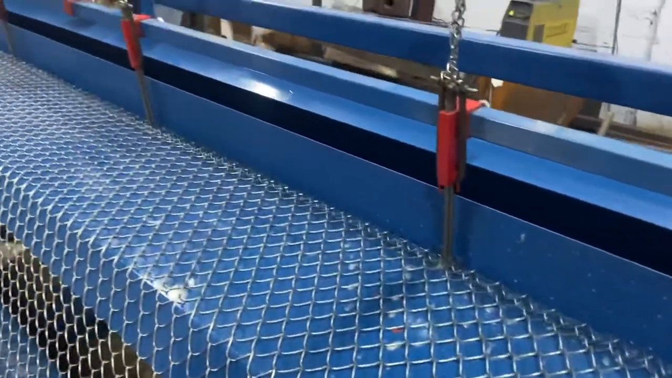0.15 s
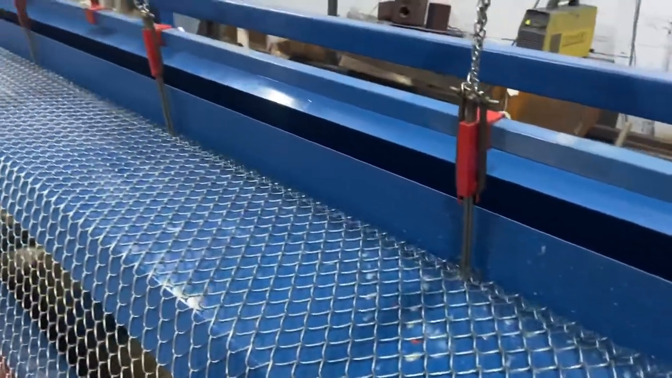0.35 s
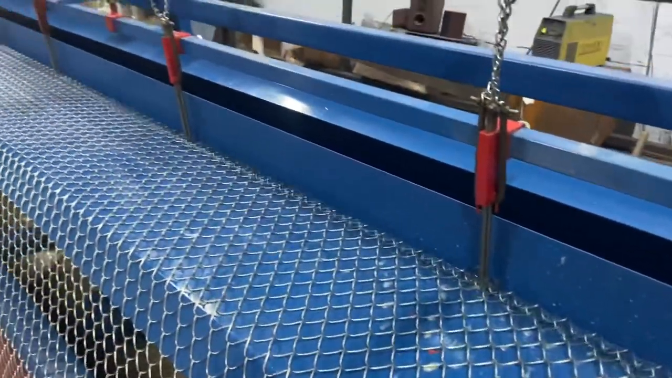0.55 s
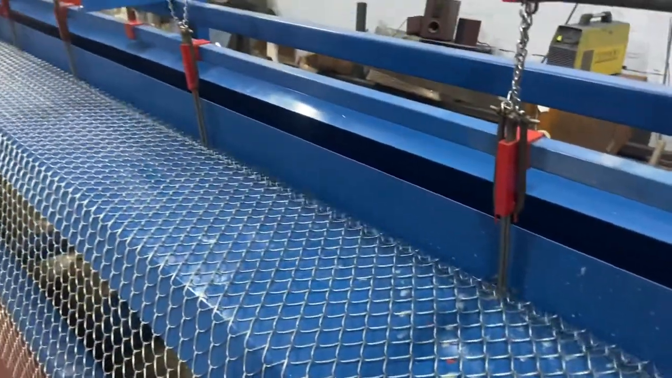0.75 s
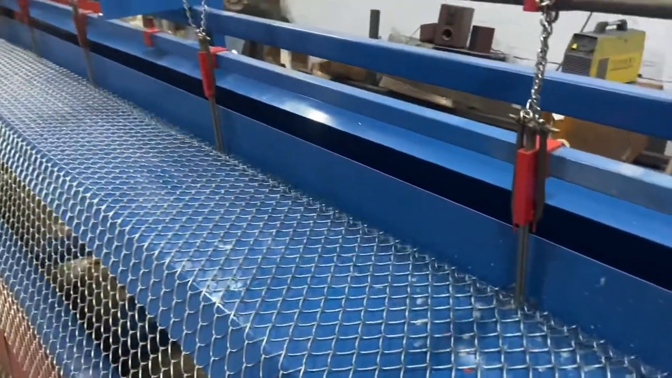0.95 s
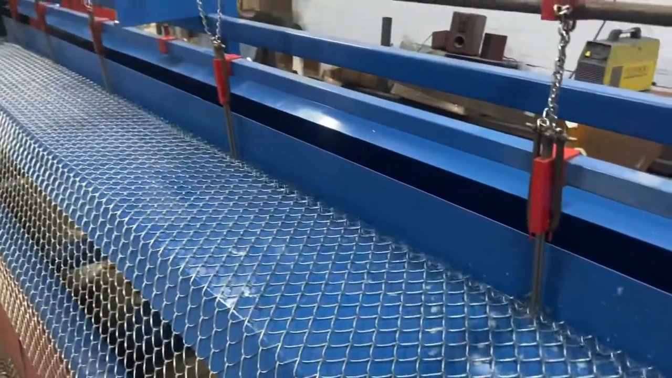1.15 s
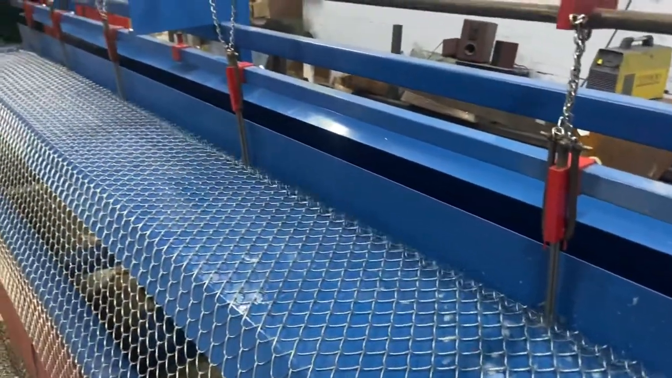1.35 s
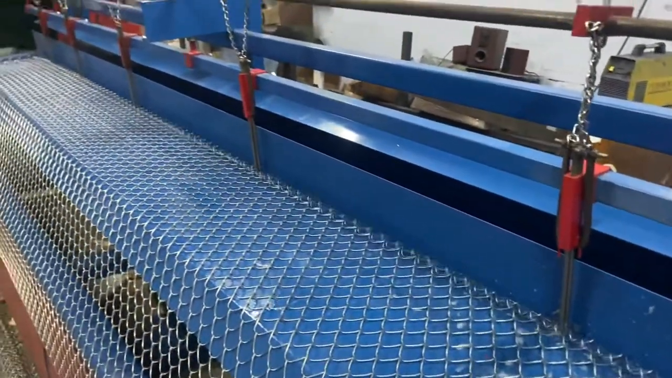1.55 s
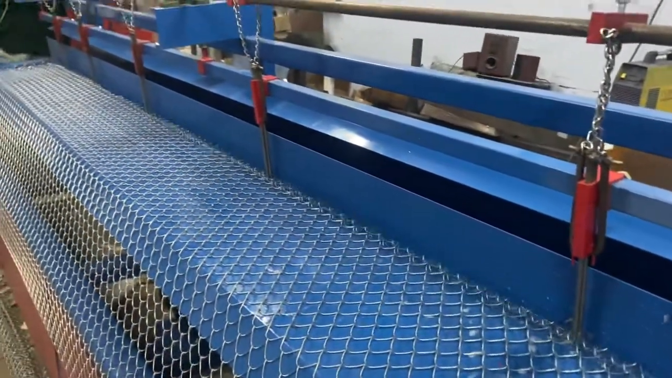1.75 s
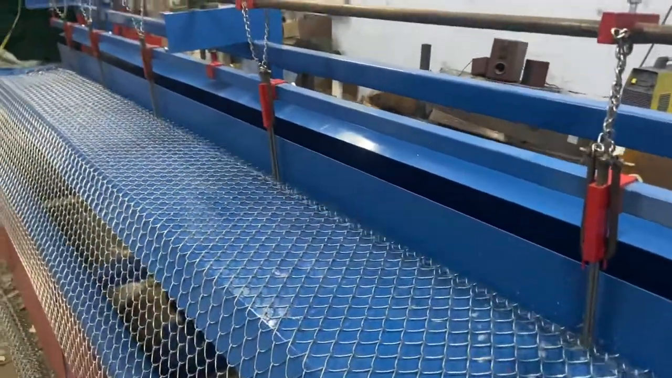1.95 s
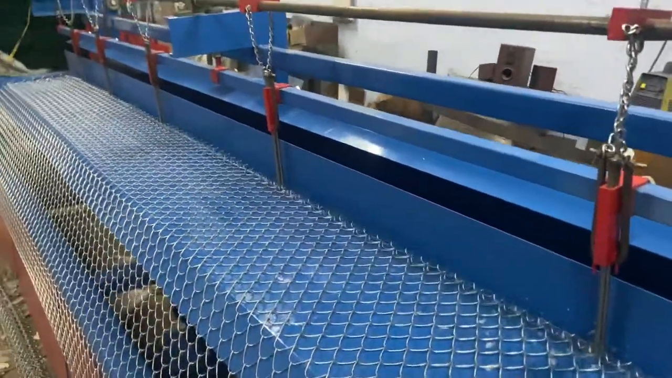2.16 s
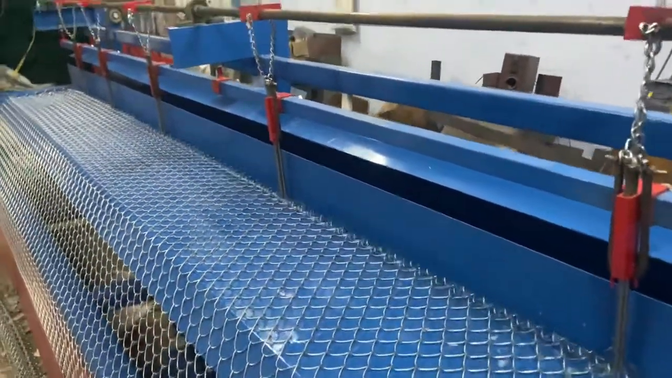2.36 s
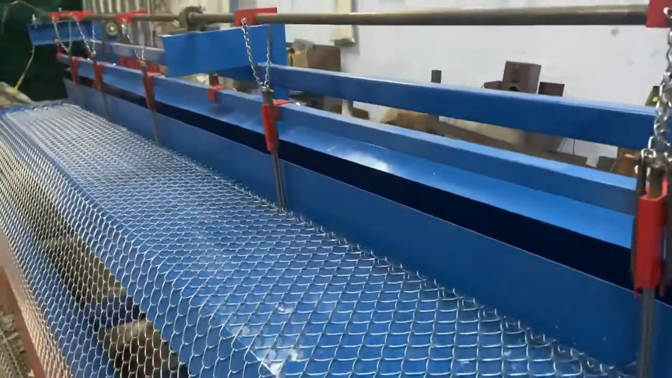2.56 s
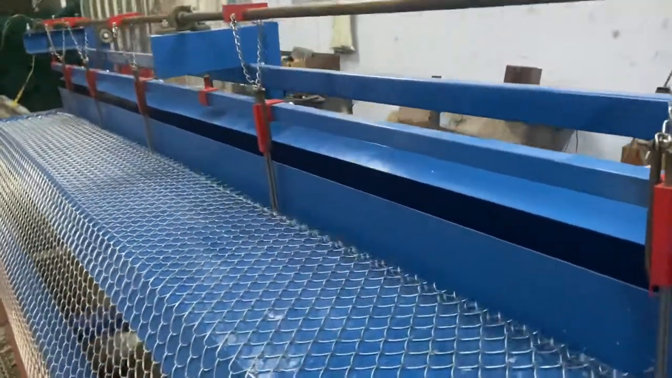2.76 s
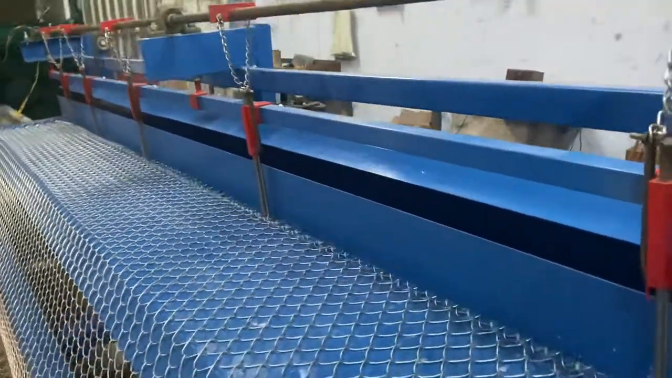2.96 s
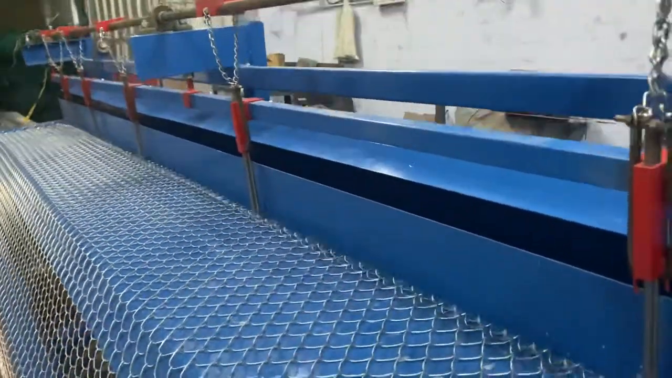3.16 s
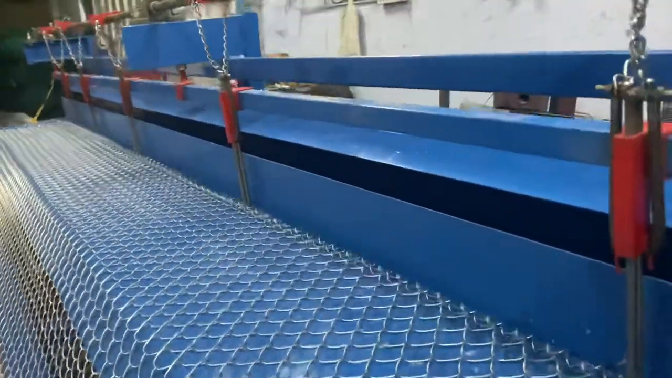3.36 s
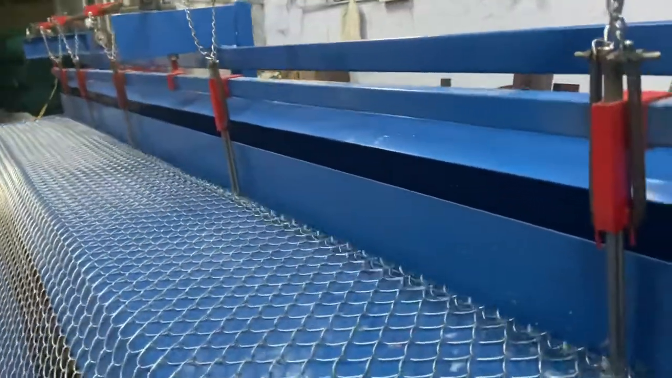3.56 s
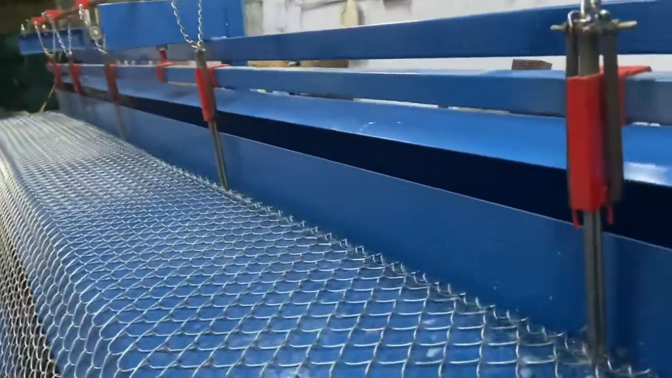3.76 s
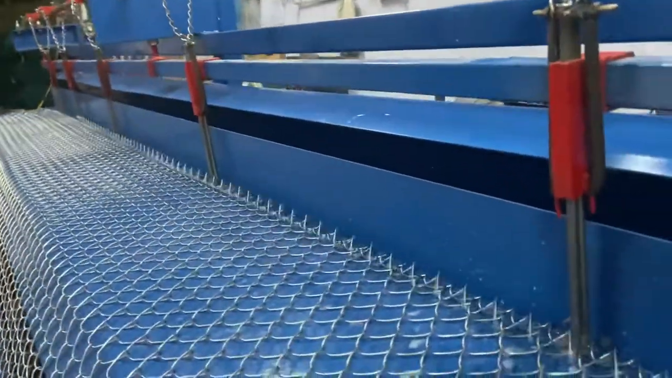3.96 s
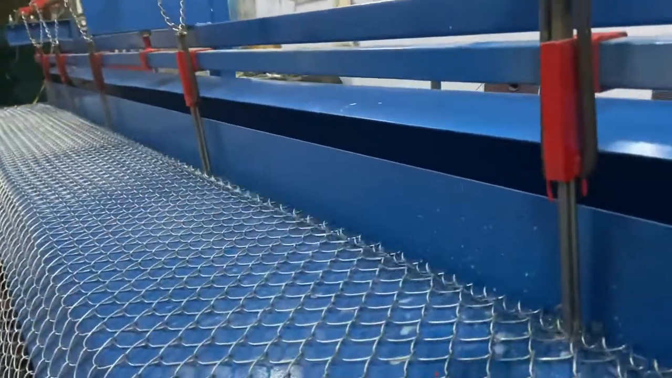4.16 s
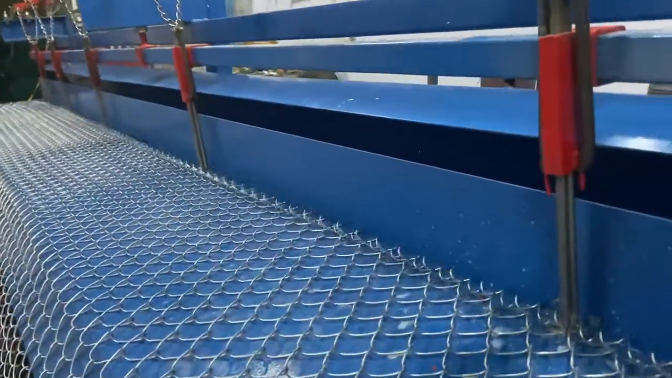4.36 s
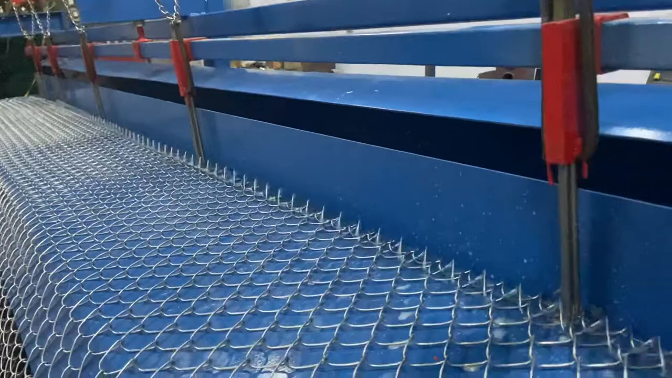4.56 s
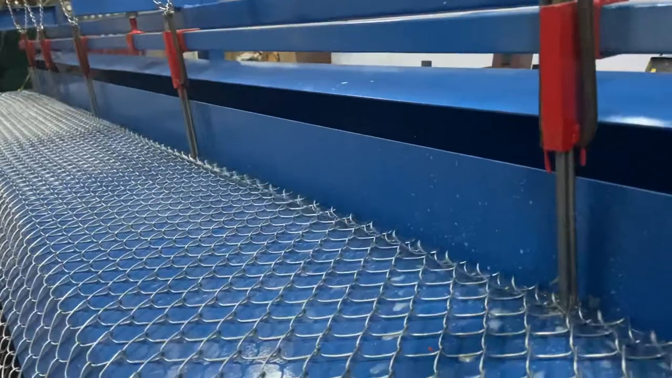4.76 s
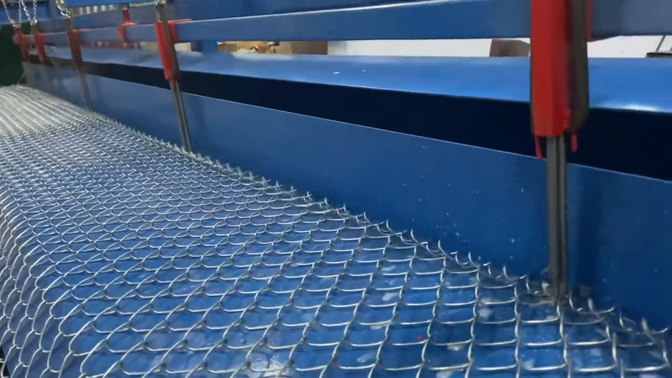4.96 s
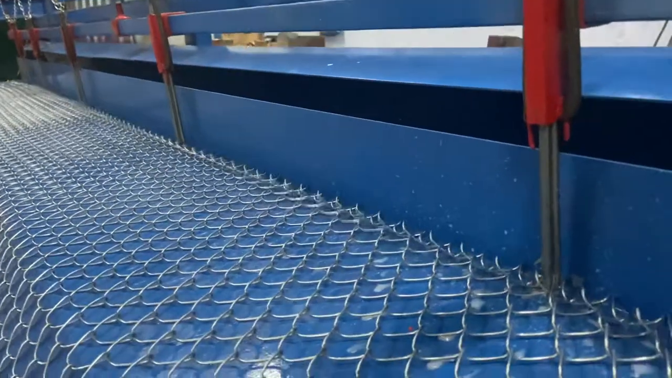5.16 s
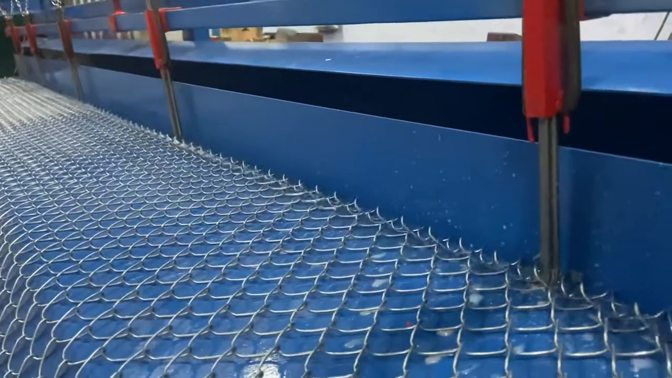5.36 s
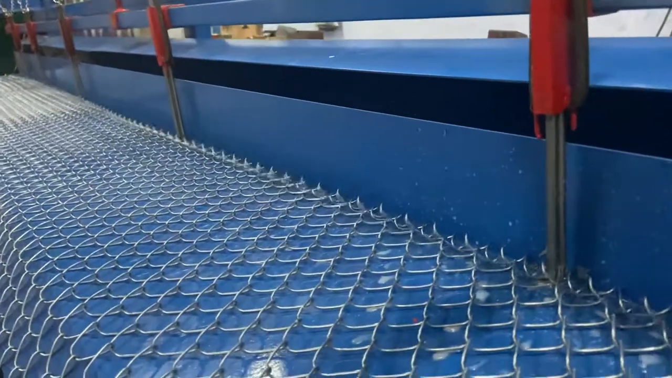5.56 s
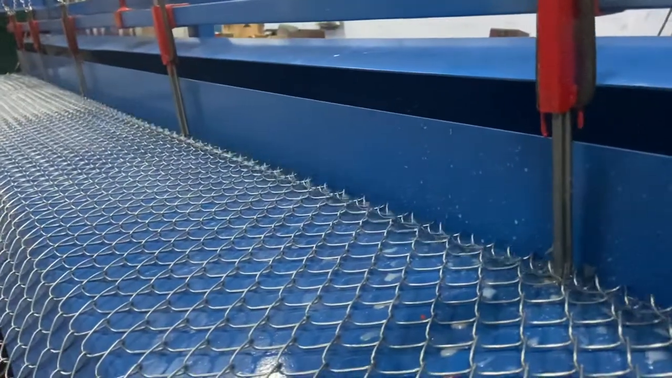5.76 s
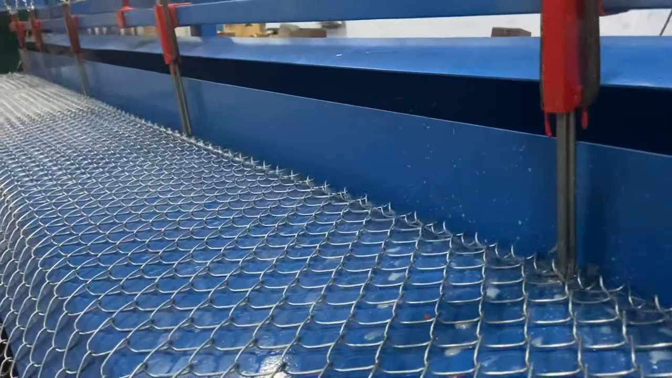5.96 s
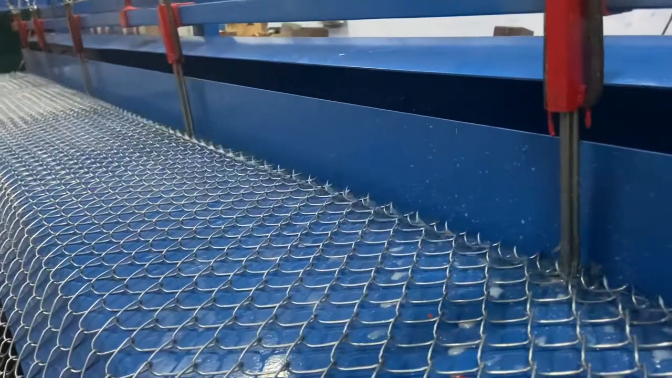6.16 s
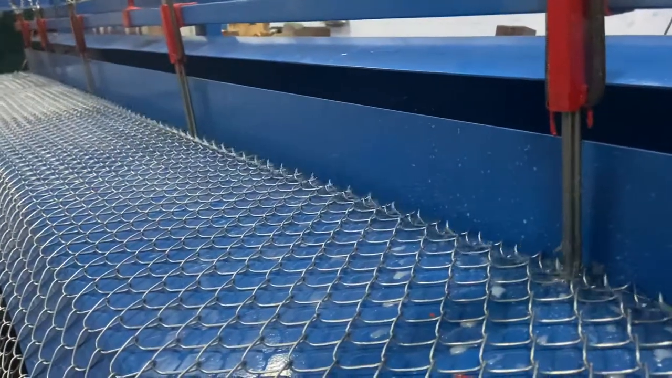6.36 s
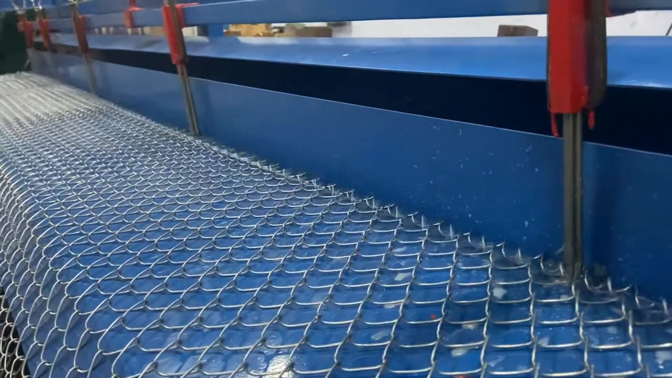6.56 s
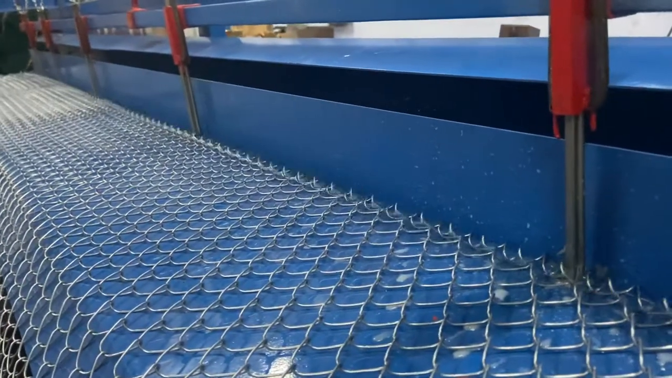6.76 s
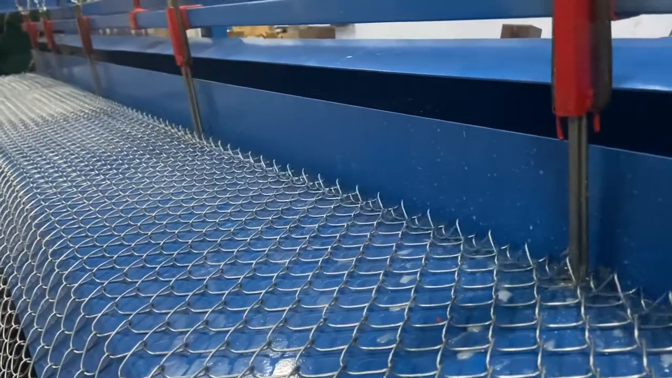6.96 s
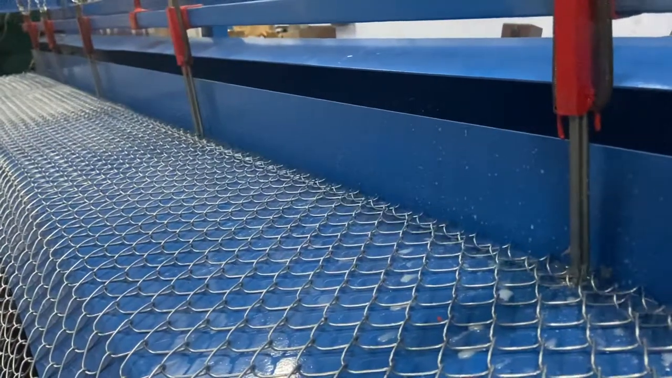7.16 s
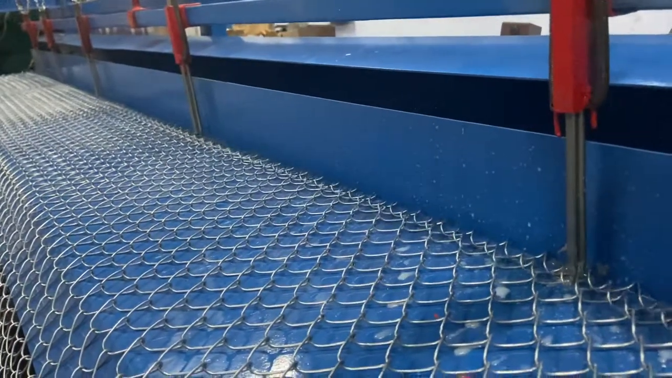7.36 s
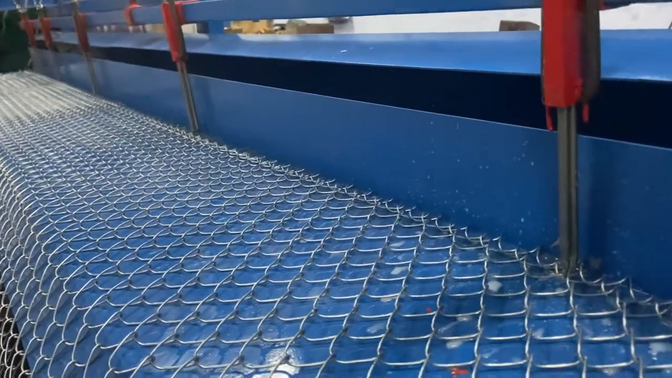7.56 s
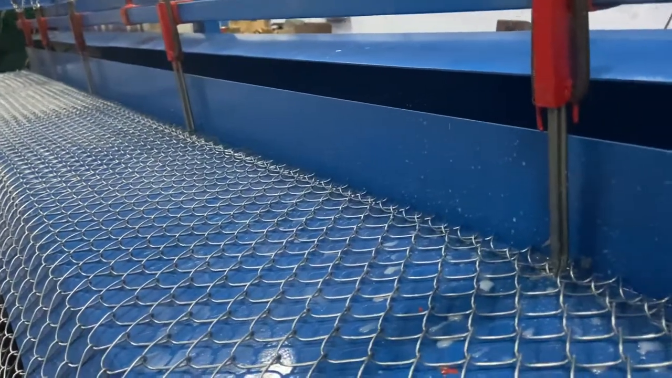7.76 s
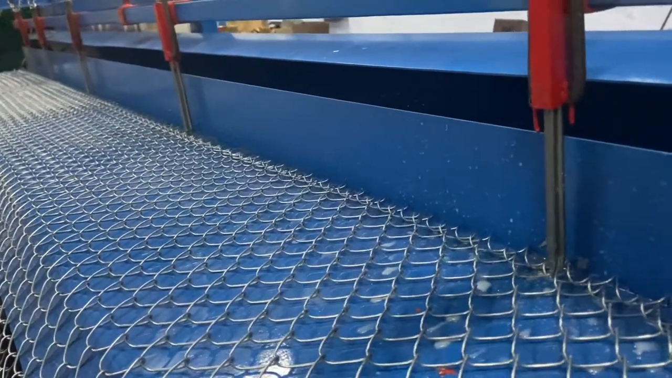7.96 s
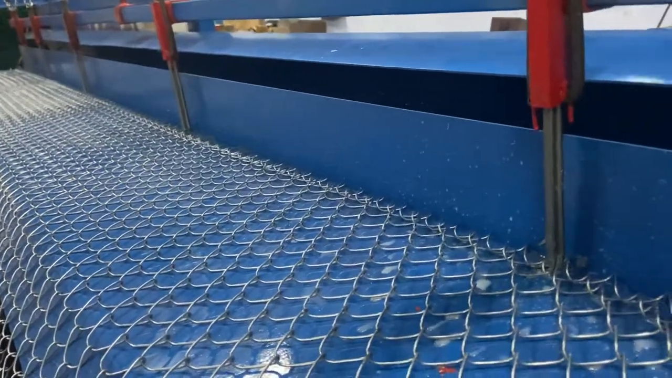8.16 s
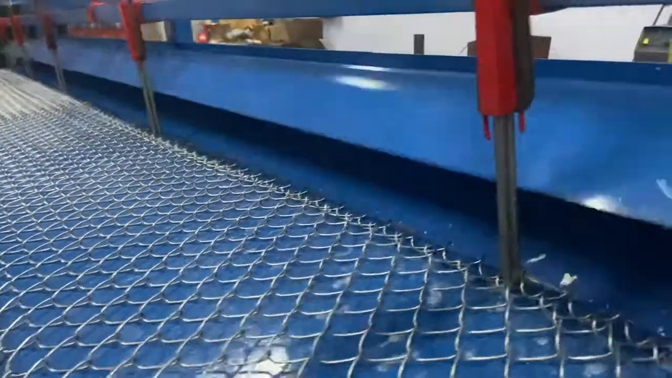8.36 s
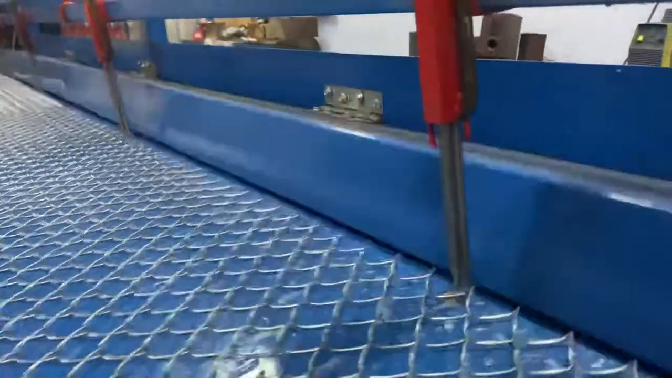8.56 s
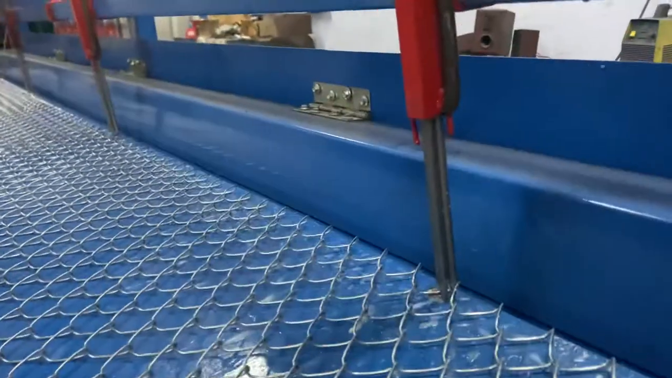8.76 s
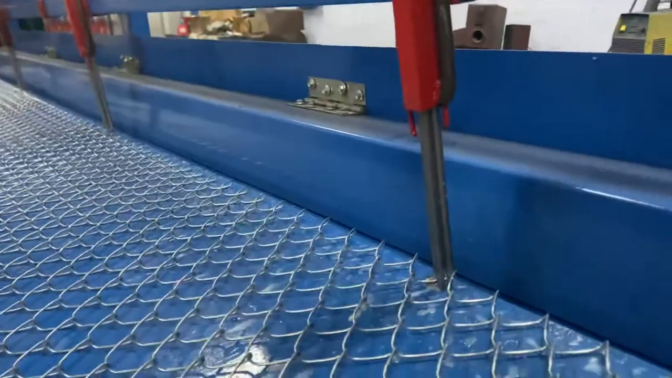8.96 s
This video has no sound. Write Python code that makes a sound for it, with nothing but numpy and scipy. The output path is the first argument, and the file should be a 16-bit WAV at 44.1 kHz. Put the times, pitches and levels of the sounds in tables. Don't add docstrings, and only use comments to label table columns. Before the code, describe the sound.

Bright steady wire clatter over a low motor rumble in a hard hall, cut off by cutter thuds, air puffs and a heavy steel flap.

```python
import sys
import numpy as np
from scipy import signal
from scipy.fft import rfft, irfft, next_fast_len
from scipy.io import wavfile
from scipy.ndimage import uniform_filter1d, map_coordinates

SR = 44100
rng = np.random.default_rng(int(sys.argv[2]) if len(sys.argv) > 2 else 0)


def invert_db(level):
    return 10 ** (np.asarray(level, dtype=float) / 20)


def digitize_waveform(pressure):
    field = np.atleast_2d(pressure).T
    bounded = np.clip(field, -1, 1)
    quanta = np.round(bounded * 32767).astype(np.int16)
    wavfile.write(sys.argv[1], SR, quanta)


N = 396900
TIME = np.arange(N) / SR


def unit(x):
    return x / np.sqrt(np.mean(x ** 2) + 1e-20)


def along(points, hz):
    f, v = np.transpose(points)
    return np.interp(np.log(hz + 1), np.log(f + 1), v)


def curves(rows):
    s, *cols = np.transpose(rows)
    return [np.interp(TIME, s, c) for c in cols]


def filtered(x, response):
    m = next_fast_len(N + 8192)
    return irfft(rfft(x, m) * response(np.fft.rfftfreq(m, 1 / SR)), m)[..., :N]


def wobble(rate):
    return map_coordinates(rng.standard_normal(int(N * rate / SR) + 4), [TIME * rate])


def steady(x, seconds):
    power = uniform_filter1d(np.mean(x ** 2, axis=0), round(seconds * SR))
    return unit(x / np.sqrt(np.abs(power) + 0.073))


def swell(times, levels_db, shape):
    starts = np.bincount(np.round(times * SR).astype(int), invert_db(levels_db) ** 2, N)
    return np.sqrt(np.abs(signal.fftconvolve(starts, shape ** 2)[:N]))


# hz, likeness (0 to 1)
LIKENESS = [(40, 0.94), (170, 0.89), (600, 0.37), (1200, 0.097), (2500, 0.05), (4200, 0.54), (5500, 0.16),
            (7000, 0.62), (9000, 0.77), (15000, 0.45)]


def spread(pair, spectrum, modes=()):
    def response(hz):
        db = along([(1, -120), (spectrum[0][0] / 2, -90)] + list(spectrum), hz)
        db = db + sum(g / (1 + (2 * (hz - c) / w) ** 2) for c, w, g in modes)
        turn = np.arccos(np.clip(along(LIKENESS, hz), 0, .99)) / 2
        return invert_db(db) * [np.cos(turn), np.sin(turn)]
    mid, side = filtered(pair, response)
    return unit(np.array([mid + side, mid - side]))


def rush(spectrum, patchy_db, modes=()):
    z = signal.stft(rng.standard_normal((2, N)), nperseg=256)[2]
    field = uniform_filter1d(rng.standard_normal(z.shape[1:]), size=3, axis=0)
    field = uniform_filter1d(field, size=6, axis=1)
    patchy = signal.istft(z * invert_db(patchy_db * unit(field)), nperseg=256)[1][:, :N]
    return spread(patchy, spectrum, modes)


# hz, t60_s
HALL_T60 = [(100, 1), (500, 0.65), (2000, 0.49), (6000, 0.35), (14000, 0.11)]


def hall(x):
    hz, t, z = signal.stft(np.pad(x, (500, 0))[:N], SR, nperseg=256)
    keep = invert_db(-120 * t[1] / along(HALL_T60, hz))
    power = uniform_filter1d(np.abs(z) ** 2, size=3, axis=0)
    power = np.array([signal.lfilter([1 - a], [1, -a], p) for a, p in zip(keep, power)])
    carrier = spread(rng.standard_normal((2, N)), [(20, 0), (20000, 0.0047)])
    noise = signal.stft(carrier, nperseg=256)[2]
    answer = unit(np.abs(noise)) * np.exp(1j * np.angle(noise)) * np.sqrt(np.abs(power))
    return signal.istft(answer, nperseg=256)[1][:, :N]


# time_s, level_db
NEARNESS = [
    (0, 1.5),
    (.5, 1),
    (1.7, 0),
    (4.3, -1),
    (5.5, -1.5),
    (6.8, -3),
]
# time_s, force_db
CUTTER = [
    (7.0, -27),
    (7.1, -6),
    (7.3, -5),
    (7.39, 0.5),
    (7.47, -4),
    (7.56, -7.5),
    (7.63, -12),
    (7.8, -16.5),
    (8.0, -25),
]
# time_s, push_on_frame_db, mesh_slide_db
SWING = [
    (8.02, -25, -32),
    (8.07, -19, -28),
    (8.16, -0.5, -24),
    (8.29, -1.5, -8.5),
    (8.38, 3, 0),
    (8.44, -2.5, -4.5),
    (8.55, -4, -3),
    (8.62, -3, -4),
    (8.74, -14, -21),
]
STOP_S, COAST_DB_PER_S = 6.89, -66.5
RESTART_S, RESTART_RISE_S, SETTLE_DB_PER_S = 8.74, 0.034, -36.5
FRAME_LAG_S = .03
# level dB, and dB gained per dB of the cause
FLOOR_DB = (-49, -57.5, -65, -62)
DRIVE_DB, DRIVE_GROWS = (-44.5, -33, -31, -60), (1.7, 0.83, .7, -1.8)
CUT_DB, CUT_GROWS = (-36, -30, -39.5, -47), (1, 1.3, 2.1, .15)
SWING_DB, SWING_GROWS = (-31.5, -33, -29, -36), (1.3, 0.43, 1.05, .8)
LOAD_DB, LOAD_GROWS = (-44, -33, -42.5, -49), (.05, 1.34, 1.7, .05)


def causes():
    step = 64
    t = TIME[::step]

    def gives(db, grows, cause_db, on):
        return on * invert_db(np.vstack(db) + np.vstack(grows) * cause_db[..., ::step]) ** 2

    def during(rows):
        return (t > rows[0][0]) & (t < rows[-1][0])

    coast = invert_db(COAST_DB_PER_S * np.clip(t - STOP_S, 0, None)) ** 2
    push_db, slide_db = curves(SWING)
    late_push_db = np.roll(push_db, round(FRAME_LAG_S * SR))
    swing_db = np.array([push_db, slide_db, slide_db, late_push_db])
    since = np.clip(TIME - RESTART_S, 0, None)
    load = 1 - np.exp(-since[::step] / RESTART_RISE_S)
    power = invert_db(np.vstack(FLOOR_DB)) ** 2 + gives(DRIVE_DB, DRIVE_GROWS, curves(NEARNESS)[0], coast)
    power = power + gives(CUT_DB, CUT_GROWS, curves(CUTTER)[0], during(CUTTER))
    power = power + gives(SWING_DB, SWING_GROWS, swing_db, during(SWING))
    power = power + gives(LOAD_DB, LOAD_GROWS, SETTLE_DB_PER_S * since, load)
    return [np.interp(TIME, t, db) for db in 10 * np.log10(power)]


# hz, level_db (per Hz)
RUMBLE = [(53, -40), (90, -5.5), (118, -12), (150, -2.5), (189, -4.5), (231, -6.5), (450, -9.5),
          (580, -10.5), (990, -120)]
# pitch_hz, width_hz, level_db
GEARS = [(147.8, 8.1, 4.5), (224, 6.4, 6.5), (250, 8.1, -2.5)]
# hz, level_db (per Hz)
THROB = [(20, -60), (30, -24), (40, -19), (51, 0), (62, 1.5), (85, -2), (110, -3), (200, -56)]
# pitch_hz, width_hz, level_db
FRAME_NOTE = [(51, 7, 9)]
# hz, level_db (per Hz)
TROUGH = [(120, -33), (200, -7), (232, 1), (277, -2.5), (322, -3.5), (463, -3), (746, 0), (1500, -6),
          (2960, -6.5), (4000, -9.5), (5200, -15), (8800, -120)]
# hz, level_db (per Hz)
HISS = [(1200, -29), (2500, -18.5), (4000, 0), (5500, 4.5), (7000, 1.5), (9000, -4), (11000, -3.5),
        (15800, -9.5)]


def drive():
    rumble_db, trough_db, hiss_db, throb_db = causes()
    rumble = invert_db(rumble_db + 0.86 * wobble(6)) * rush(RUMBLE, patchy_db=.5, modes=GEARS)
    throb = invert_db(throb_db + 1.5 * wobble(8)) * rush(THROB, patchy_db=0.5, modes=FRAME_NOTE)
    roar = invert_db(trough_db + 0.5 + 1.25 * wobble(14)) * rush(TROUGH, patchy_db=1.5)
    hiss = invert_db(hiss_db + 0.67 * wobble(40)) * rush(HISS, patchy_db=4.0)
    return rumble + throb + roar + hiss


# pitch_hz, level_db
MESHING = [(229, -54), (243, -54.5), (145.4, -56.5)]
# start_s, length_s, pitch_hz, level_db
WHINES = [
    (8.805, .135, 595, -40),
    (8.858, 0.061, 1225, -53),
    (8.93, .05, 592, -39),
    (8.975, 0.041, 545, -42),
]


def motor():
    def phase(depth, rate):
        return 2 * np.pi * np.cumsum(1 + depth * wobble(rate)) / SR

    slow, fast = phase(0.0042, 5), phase(0.0066, 40)
    gears = sum(invert_db(db) * np.sin(hz * slow) for hz, db in MESHING)
    coast_db = COAST_DB_PER_S * np.clip(TIME - STOP_S, 0, None)
    out = gears * invert_db(1.5 * curves(NEARNESS)[0] + 2.5 * wobble(8) + coast_db)
    flutter = invert_db(4.0 + 2.5 * wobble(70))
    for s, length, hz, db in WHINES:
        here = slice(round(s * SR), round((s + length) * SR))
        arch = np.sin(np.pi * np.clip((TIME[here] - s) / length, 0, 1)) ** .7
        out[here] += arch * invert_db(db) * flutter[here] * np.sin(hz * fast[here])
    return out


# start_s, clank_db, thud_db (re clank), puff_db (re clank), t60_s
BLOWS = [(7.0444, -29, -26, -28, 0.12), (7.1911, -35, 9, 1.5, 0.19), (7.2616, -36, -11, 1.5, 0.21),
         (7.297, -16, -2.5, -23.5, 0.094), (7.3065, -13, 7.5, -11, 0.059), (7.3174, -7.5, -18, -33, 0.082),
         (7.357, -28, -14, -20, 0.14), (7.3994, -24, -3, -17, 0.088), (7.4914, -30, 0.5, -7, 0.42),
         (7.7009, -49.5, 14, -33, 0.33), (8.022, -44, 9.5, -30, 0.15), (8.045, -46, 9, -17, 0.12),
         (8.0986, -42, 15.5, -25, 0.14), (8.1978, -42.5, 10.5, -25, 0.36), (8.2501, -23, -5, -3.5, 0.25),
         (8.318, -18, -4.5, -12, 0.22), (8.3556, -8.5, -3, -6, 0.094), (8.5978, -3.5, -2.5, -9.5, 0.092),
         (8.609, -7.5, -30, -29.5, 0.11)]
# hz, level_db (per Hz)
CLANK = [(900, -27), (1600, -4.5), (2300, -1.5), (3200, 0), (4000, -4.5), (5500, 1.5), (7000, -10.5),
         (9000, -25.5), (14000, -51)]
# hz, level_db (per Hz)
THUD = [(60, -15), (130, -5), (250, -6), (380, 1.5), (520, 6.5), (800, -2), (1200, 1), (1600, -0.5),
        (3000, -28)]
# hz, level_db (per Hz)
PUFF = [(4000, -1.5), (7000, 1.5), (9000, -5), (11000, -4.5), (14000, -12), (15800, -10)]
# pitch_hz, width_hz, level_db
FLAP = [(680, 180, 5), (1010, 120, 5.5), (2270, 120, 8.5), (3820, 150, 4), (4480, 83, -2), (5280, 54, -3)]
CUTTER_PAN_DB, BLOWS_PAN_DB, BLOWS_WANDER_DB = -2.3, .1, .7


def blows():
    clank, thud, puff = (steady(rush(tone, patchy_db=4.0, modes=FLAP), 0.0024) for tone in (CLANK, THUD, PUFF))
    out = np.zeros((2, N))
    for (s, db, thud_db, puff_db, t60), stray in zip(BLOWS, rng.standard_normal(len(BLOWS))):
        pan_db = CUTTER_PAN_DB if s < SWING[0][0] else BLOWS_PAN_DB
        pan_db += BLOWS_WANDER_DB * stray
        start = round(s * SR)
        t = TIME[:min(SR // 2, N - start)]
        here = slice(start, start + len(t))

        def fade(rise, longer):
            return (1 - np.exp(-t / rise)) * invert_db(-60 * t / (t60 * longer))

        mix = fade(0.0031, 0.92) * clank[:, here]
        mix += invert_db(thud_db) * fade(0.0013, 1.73) * thud[:, here]
        mix += invert_db(puff_db + 10.5) * fade(.0008, 0.65) * puff[:, here]
        out[:, here] += invert_db(db - 5.5 + pan_db * np.array([[.5], [-.5]])) * mix
    return out


# time_s, landing_lag_ms, second_bend_lag_ms, clash_delay_ms
WIND_UP = [(0, 11, 0.33, 9), (.8, 13.7, 0.87, 13), (1.9, 17, .1, 11), (2.9, 14.5, .1, 14), (4, 9.3, 7, 16),
           (5, 12, 3.7, 16), (6, 8.8, 7, 17.3), (6.9, 9.3, 6.5, 25)]
HALF_TURN_S, HALF_TURNS, LAST_TURN_S = .10025, 69, 7.016
TICK_DB, BRIGHT_DB, CLASH_DB, RATTLE_DB = -16.5, 1.5, -14.5, -25.5
TICK_FADES_DB, LAST_TURN_DB = -6, -6
SCATTER_MS, SCATTER_DB = 1.37, (1.1, 1.1, 1.4, 0.75)
SECOND_CLASH_LATER, SECOND_SOFTER_DB = .3, -.8


def turns():
    k = np.arange(HALF_TURNS + 1)
    shaft, chance = k * HALF_TURN_S, rng.standard_normal((len(k), 6))
    knots_s, *columns = np.transpose(WIND_UP)
    lag, second, delay = (np.interp(shaft, knots_s, c) for c in columns)
    second = second * (k % 2)
    s = np.abs(shaft + (lag + second + SCATTER_MS * chance[:, 0]) / 1000)
    s[-1] = LAST_TURN_S
    delay = (delay + SECOND_CLASH_LATER * second + SCATTER_MS * chance[:, 1]) / 1000
    db = np.array([TICK_DB, BRIGHT_DB, CLASH_DB, RATTLE_DB]) + np.array(SCATTER_DB) * chance[:, 2:]
    db[:, 0] += (TICK_FADES_DB + SECOND_SOFTER_DB * second) * (shaft / STOP_S) ** 3
    db[-1] += LAST_TURN_DB
    return s, db[:, 0], db[:, 1], delay, db[:, 2], db[:, 3]


def grains(count, cycles, spread_db, blur):
    when, pitch, size = rng.random((3, count, 1))
    hz, k = np.float32(1500 + 14500 * pitch), np.arange(256, dtype=np.int16)
    size = np.float32(.9999 * size)
    decay = invert_db(-spread_db * np.log(1 - size) - 60 * k * hz / SR / cycles)
    ring = decay * np.sqrt(hz) * np.sin(2 * np.pi * hz * k / SR)
    place = (when * 2 * N).astype(int) + k
    near = np.bincount(place.ravel(), ring.ravel(), 2 * N + 256)[:2 * N].reshape(2, N)
    return unit(near) + blur * rng.standard_normal((2, N))


# hz, level_db (per Hz)
TICK = [(1000, -26), (2500, -19), (4500, -8), (6500, -4), (8500, 9), (10500, -1.5), (13000, -5.5),
        (15800, -6)]
# pitch_hz, width_hz, level_db
PING = [(7150, 270, -0.5), (9020, 220, 1.5), (10530, 330, 4.5)]
# hz, level_db (per Hz)
CLASH = [(800, -26), (2200, -13.5), (3600, -11.5), (4600, -5), (5800, 3.5), (7000, -3), (8500, -8),
         (11000, -7), (15800, -18.5)]
# hz, level_db (per Hz)
RATTLE = [(800, -43.5), (2200, -11), (3500, -10.5), (5400, 0.5), (7000, -5), (8500, -7), (11000, -7.5),
          (15800, -13)]
# pitch_hz, width_hz, level_db
WIRE = [(5260, 50, -5.5), (5930, 40, -11), (6370, 170, 0), (7120, 110, 7.5), (7320, 130, 0),
        (8270, 370, 5.5), (10730, 110, 2.5)]
# time_s, amount (-1 to 1)
COLOUR_DRIFT = [(0, -.7), (2, -0.61), (3.5, -0.15), (5, 1), (6.5, 0.65), (7.1, 0.59)]
# hz, share
COLOUR_SHIFT = [(1200, -0.11), (2500, -0.45), (4000, 0.085), (5200, 0.077), (7000, 0.33), (8500, -0.3),
                (16000, 0.12)]
CLASH_PING_DB = -4


def wire():
    s, tick_db, bright_db, delay, clash_db, rattle_db = turns()
    clash_s = s + delay - .003
    t = TIME[:SR // 4]

    def blow(rise, t60):
        return (1 - np.exp(-t / rise)) * invert_db(-60 * t / t60)

    drag = blow(0.0045, 0.66) / np.sqrt(1 + (t / 0.081) ** 9)
    short = .85 * blow(.002, .2) * np.exp(-(t / .009) ** 2)
    heavy = blow(.003, .085)
    tick = np.hypot(swell(s, tick_db + bright_db + 2.2, short), swell(clash_s, clash_db + CLASH_PING_DB, short))
    clash = np.hypot(swell(s, tick_db - 3.5, heavy), swell(clash_s, clash_db + .5, heavy))
    rattle = swell(np.clip(s - .004, 0, None), rattle_db + 3, drag)

    tick_grains = grains(count=12000, cycles=80, spread_db=-0.5, blur=0.93)
    clash_grains = grains(count=12000, cycles=64, spread_db=3, blur=0.86)
    rattle_grains = grains(count=14000, cycles=150, spread_db=2.5, blur=1.0)
    contacts = tick * steady(spread(tick_grains, TICK, PING), 0.00148)
    contacts += clash * steady(spread(clash_grains, CLASH, WIRE), 0.0026)
    contacts += rattle * invert_db(1.0 * wobble(90)) * steady(spread(rattle_grains, RATTLE, WIRE), 0.006)
    contacts += curves(COLOUR_DRIFT)[0] * filtered(contacts, lambda hz: along(COLOUR_SHIFT, hz))
    sheet = invert_db(-10.5) * np.hypot(rattle, 0.35 * clash) * rush(TROUGH, patchy_db=1.5)
    return contacts + sheet


def scene():
    weave, bangs = wire(), blows()
    echoes = hall(invert_db(-4) * weave[0] + invert_db(-6) * (bangs[0] + bangs[1]) / 1.56)
    return weave + bangs + echoes + drive() + motor()


def band_limit(x):
    return signal.sosfilt(signal.butter(12, 17080, fs=SR, output="sos"), x)


# hz, lag_rad
PORT_LAG = [(40, 0.58), (170, -0.2), (850, 1.26), (1500, -0.86), (2500, -1.9), (4000, -0.85), (5700, 1.16),
            (6500, 0.082)]


def record(dry):
    def response(hz):
        lag = along(PORT_LAG, hz) + 2 * np.pi * np.clip(hz - 6900, -400, None) / 4300 * (hz > 6500)
        tilt_db = np.array([[-1], [1]]) * np.clip(1 - hz / 1500, 0, 1)
        return np.exp(np.array([[-.5j], [.5j]]) * lag) * invert_db(tilt_db)

    ports = filtered(dry, response)
    ports = ports / (1 + np.abs(ports / .95) ** 5) ** (1 / 5)
    return band_limit(ports)


dry = scene()
out = record(dry)
digitize_waveform(out)
```